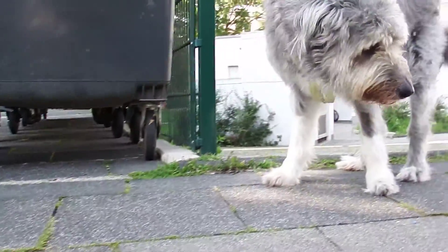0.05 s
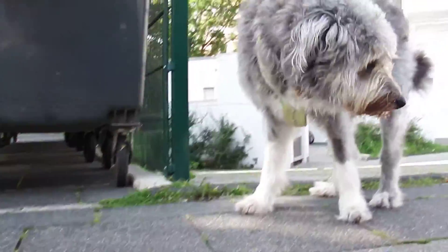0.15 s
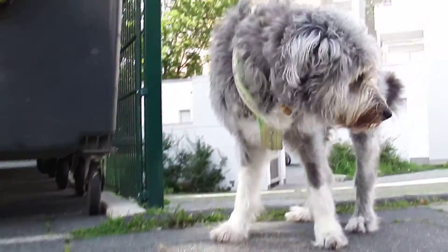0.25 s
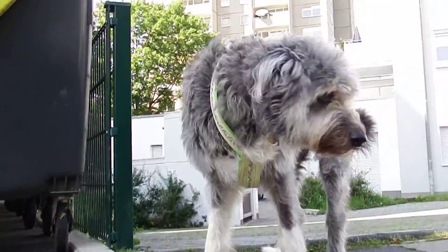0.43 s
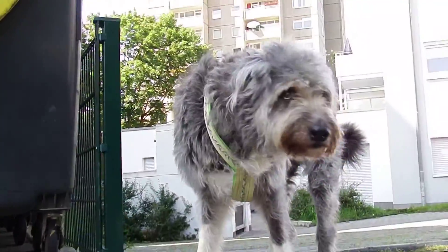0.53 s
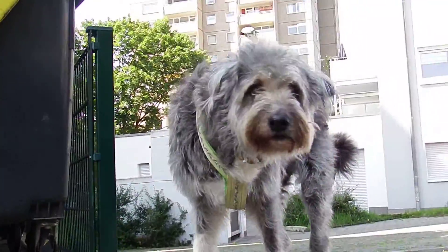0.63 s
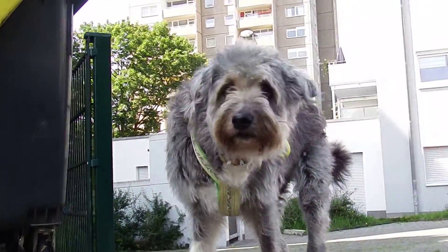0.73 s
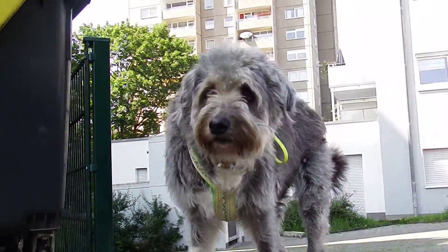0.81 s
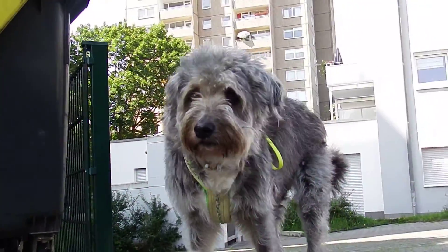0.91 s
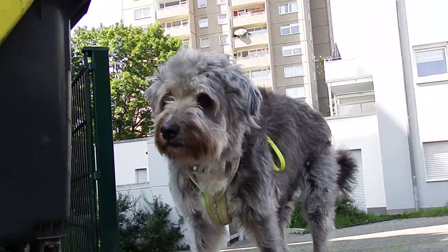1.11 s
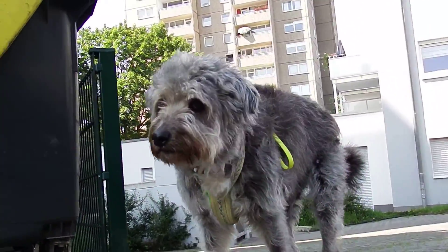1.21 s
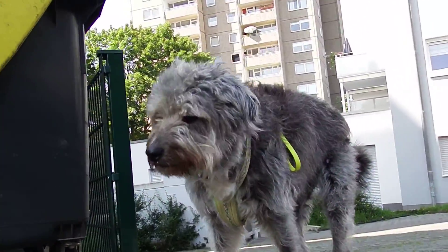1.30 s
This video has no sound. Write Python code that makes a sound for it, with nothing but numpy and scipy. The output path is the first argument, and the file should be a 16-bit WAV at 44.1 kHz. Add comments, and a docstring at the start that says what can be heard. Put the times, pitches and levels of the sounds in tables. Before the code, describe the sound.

A brief, hollow scrape of grit on paving stands out nearby, just after a few dull taps on the microphone. It ends with a crack, then soft shuffles and handling bumps sound against steady town noise in a yard.

```python
"""One short, gritty scuff on the pavement close by, which rings hollow and ends with a snap of grit.
Grinding grit is many tiny clicks mixed with hiss; bigger grains each give one sharp crack.
Three dull taps on a camera lead into the scuff, as the camera is lifted in front of a silent dog.
Later come a faint tap, soft shuffles and low bumps from the hand that holds it.
Behind it all is the steady wash of a yard between apartment blocks."""
import sys
import numpy as np
from scipy import signal
from scipy.fft import rfft, irfft
from scipy.io import wavfile
from scipy.ndimage import uniform_filter1d

SR = 44100
rng = np.random.default_rng(int(sys.argv[2]) if len(sys.argv) > 2 else 0)


def materialize(psi):
    """Save the field psi as 16-bit PCM at rate SR to the path in sys.argv[1].

    A 1-D psi becomes a single channel; in a 2-D psi each row is a channel.
    """
    bounded = np.clip(np.atleast_2d(psi).T, -1, 1)
    quanta = np.round(bounded * 32767).astype(np.int16)
    wavfile.write(sys.argv[1], SR, quanta)


N = 59535
TIME = np.arange(N) / SR

# How loud the scuff's bright rasp and dull body are: time_s, level_db
RASP_LEVEL = [(0.14, -55.5), (0.188, -44), (0.202, -36.5), (0.222, -40), (0.245, -38), (0.261, -32.5),
              (0.264, -25), (0.297, -24.5), (0.31, -24), (0.323, -22), (0.333, -27.5), (0.346, -49),
              (0.415, -49.5), (0.49, -71)]
BODY_LEVEL = [(0.185, -58), (0.204, -41), (0.252, -44), (0.273, -31), (0.31, -32), (0.322, -44.5),
              (0.35, -55)]
# Their tone colour, or how strong they are from low to high: frequency_hz, level_db
RASP_COLOUR = [(40, -75), (200, -62), (700, -17), (1300, -5), (1600, -12.5), (2700, 1), (3850, -0.5),
               (4200, -10.5), (4800, -10.5), (6100, -25), (8800, -27.5), (12500, -46), (15500, -58)]
BODY_COLOUR = [(60, -64), (190, -38), (440, 1.5), (620, -7), (1350, -1.5), (2000, -5), (5000, -48)]
# Thin ringing notes in the rasp: pitch_hz, width_hz, gain_db
RASP_RINGS = [(3320, 55, 0), (4440, 60, 3)]
# How alike the scuff is on the left and right: frequency_hz, likeness_0_to_1
SCUFF_LIKENESS = [(200, 0.79), (700, 0.99), (4000, 0.89), (8000, 0.11), (15000, 0.22)]


def scuff():
    """Grit grinds on the paving: a bright rasp with thin rings, over a dull body and a hollow ring."""
    rasp = level(RASP_LEVEL) * coloured(grit(), RASP_COLOUR, SCUFF_LIKENESS)
    rings = sum(amp(db) * signal.lfilter(*signal.iirpeak(hz, hz / width, SR), rasp)
                for hz, width, db in RASP_RINGS)
    body = level(BODY_LEVEL) * coloured(grit(), BODY_COLOUR, SCUFF_LIKENESS)
    return rasp + rings + body + hollow_ring()


def grit(clicks_per_s=3000, spread_db=2.5, click_share=0.45):
    """Tiny grains make clicks of uneven size, mixed with the smooth hiss of rubbing."""
    sizes = amp(spread_db * np.minimum(rng.exponential(1, N), 3))
    hits = rng.random(N) < clicks_per_s / SR
    clicks = unit(sizes * hits * rng.choice([-1, 1], (2, N)))
    return np.sqrt(click_share) * clicks + np.sqrt(1 - click_share) * hiss()


# The sliding hollow note inside the scuff: time_s, pitch_hz, level_db
HOLLOW_NOTE = [(0.13, 780, -78), (0.203, 920, -43), (0.228, 730, -43), (0.26, 740, -44),
               (0.281, 750, -27.5), (0.291, 685, -26), (0.301, 710, -36), (0.309, 730, -27),
               (0.32, 750, -36), (0.332, 760, -36), (0.346, 760, -85)]


def hollow_ring(width_hz=145, evenness=0.8):
    """Rubbing keeps one hollow note ringing while its pitch slides."""
    times, hz, db = np.transpose(HOLLOW_NOTE)
    pitch = np.interp(TIME, times, hz)
    ring = resonate(rng.standard_normal(N), pitch, width_hz)
    evened = ring / (abs(ring) + 1e-20) ** evenness  # partly flattens the random swings in loudness
    ring = resonate(evened, pitch, width_hz).real
    return amp(np.interp(TIME, times, db)) * unit(cut_lows(ring, hz.min() / 2))


# Bigger grains that snap, and in the last row a faint tick as the hand touches the camera: start_s, peak_db,
# treble_db_per_octave
SNAPS = [(0.2632, -17, -1), (0.2726, -12.5, -5), (0.2806, -14, -7), (0.2857, -15, -6), (0.2897, -15, -7),
         (0.3174, -3.5, 0), (0.3217, -15, -3), (0.3255, -13, -4), (0.3775, -36, 2), (0.4125, -36, 2),
         (1.0542, -31.5, -12)]
# The tone colour of a snap: frequency_hz, level_db
SNAP_COLOUR = [(50, -65), (300, -35), (1200, -15), (2300, 0), (3200, 0), (4200, -6), (6000, -23),
               (8200, -23), (11000, -37), (15500, -53), (20000, -75)]
# Echoes from nearby surfaces: delay_s, gain_db
SNAP_ECHOES = [(.001, -9), (.0043, -14)]


def snaps(treble_from_hz=4000):
    """Single grains give way, each with a sharp crack and two quick echoes; one late tick of the hand sounds
    the same way."""
    out = np.zeros((2, N))
    for start_s, peak_db, tilt_db in SNAPS:
        colour = [(hz, db + tilt_db * max(np.log2(hz / treble_from_hz), 0)) for hz, db in SNAP_COLOUR]
        crack = click(colour)
        for delay_s, echo_db in [(0, 0)] + SNAP_ECHOES:
            add(out, start_s + delay_s, amp(peak_db + echo_db) * crack)
    return out


# Taps on the camera: start_s, peak_db, thud_db, thud_left_minus_right_db
TAPS = [(0.0729, -25, -54, 2), (0.1104, -24, -40, 7), (0.1361, -25.5, -33, 17), (1.0545, -35.5, -57, -2)]
# The tone colour of a tap and of the thud under it: frequency_hz, level_db
TAP_COLOUR = [(80, -62), (250, -12.5), (500, 1.5), (850, -4), (1350, -2), (1900, -20), (3000, -17.5),
              (6000, -51)]
THUD_COLOUR = [(30, -43), (110, -8.5), (200, 1.5), (380, 4), (650, -12.5), (2000, -73)]


def taps(echo_s=0.00559, echo_db=-8.5):
    """Each tap on the camera makes a dull click, one quick echo and a low thud."""
    out = np.zeros((2, N))
    tap, thud = -click(TAP_COLOUR), -click(THUD_COLOUR)
    for start_s, peak_db, thud_db, pan_db in TAPS:
        add(out, start_s, amp(peak_db) * tap)
        add(out, start_s + echo_s, amp(peak_db + echo_db) * tap)
        add(out, start_s, amp(thud_db) * pan(pan_db) * thud)
    return out


# How loud the hand's rubbing is: time_s, level_db
RUB_LEVEL = [(0.04, -64), (0.15, -48), (0.22, -50.5), (0.27, -69), (0.54, -52), (0.6, -65.5), (1.17, -62),
             (1.26, -50), (1.295, -39), (1.35, -68)]
# The tone colour of the rubbing: frequency_hz, level_db
RUB_COLOUR = [(25, -37), (60, -35), (110, -6.5), (170, 2.5), (300, 0), (500, -10.5), (1200, -53)]


def hand_rub():
    """The hand rubs on the camera with a low rumble that comes and goes."""
    return level(RUB_LEVEL) * coloured(hiss(), RUB_COLOUR, likeness=[(100, 0.19)])


# Bumps of the hand on the camera: start_s, level_db, pitch_hz, left_minus_right_db
BUMPS = [(0.001, -32.5, 217, -7.5), (0.2049, -35, 270, -15.5), (1.242, -38, 249, -5.5),
         (1.279, -38, 238, -6), (1.289, -32.5, 356, 7), (1.301, -42, 226, 16)]


def bumps(rise_s=0.0017, decay_s=0.0036, roughness=0.19, right_phase_rad=1.08):
    """Each bump gives the camera body a low, rough shake that dies away quickly."""
    out = np.zeros((2, N))
    t = np.arange(3000) / SR
    fade = (1 - np.exp(-t / rise_s)) * np.exp(-t / decay_s)
    fade /= fade.max()
    for start_s, db, pitch_hz, pan_db in BUMPS:
        rub = coloured(hiss(), RUB_COLOUR, YARD_LIKENESS)[:, :len(t)]
        tone = np.sin(2 * np.pi * pitch_hz * t + np.array([[0], [right_phase_rad]]))
        shake = cut_lows(fade * (tone + roughness * rub), below_hz=136)
        add(out, start_s, amp(db) * pan(pan_db) * shake)
    return out


# Faint shuffles: start_s, length_s, level_db, rise_s
SHUFFLES = [(1.053, .036, -46.5, .002), (1.14, .11, -52.5, .06), (1.3, .06, -44.5, .02)]
# Their tone colour: frequency_hz, level_db
SHUFFLE_COLOUR = [(50, -46), (350, 1), (600, 7), (950, -4.5), (1400, 1), (2000, -3), (3350, -1), (3580, 8),
                  (3900, -3), (6500, -28), (15000, -59)]


def shuffles(fade_s=0.033):
    """Light rubs on the gritty paving swell, hold and fade."""
    gain = np.zeros(N)
    for start_s, length_s, db, rise_s in SHUFFLES:
        rise = np.clip((TIME - start_s) / rise_s, 0, 1)
        fade = np.exp(-np.maximum(TIME - start_s - length_s, 0) / fade_s)
        gain += amp(db) * rise * fade
    return gain * coloured(grit(), SHUFFLE_COLOUR, SCUFF_LIKENESS)


# The tone colour of the yard: frequency_hz, level_db
YARD_COLOUR = [(25, -41), (110, -10), (170, -7.5), (270, 2.5), (450, 1.5), (800, -0.5), (1800, -2),
               (3350, 0), (3620, 3), (3900, -1.5), (4400, -4), (5200, -13.5), (6200, -21.5), (9000, -24),
               (15500, -33)]
# How alike left and right are in the yard (and the bumps' rubbing): frequency_hz, likeness_0_to_1
YARD_LIKENESS = [(60, 0), (180, 1), (1000, 0.81), (5000, 0.85), (7000, 0.01), (15000, 0.35)]


def yard(level_db=-48.5, patch_db=1.5):
    """The distant town and leaves blend into a steady wash with slightly louder and softer patches."""
    spectrum = signal.stft(hiss(), nperseg=512)[2]
    patches = rng.standard_normal(spectrum.shape[1:])
    patches = uniform_filter1d(patches, size=8, axis=0)  # smooth from low to high
    patches = unit(uniform_filter1d(patches, size=12, axis=1))  # smooth over time
    air = signal.istft(spectrum * amp(patch_db * patches))[1][:, :N]
    return amp(level_db) * coloured(air, YARD_COLOUR, YARD_LIKENESS)


def amp(db):
    """Turns decibels into a number to multiply by."""
    return 10 ** (np.asarray(db) / 20)


def unit(x):
    """Scales a sound to an average strength (rms) of 1."""
    return x / np.sqrt(np.mean(x ** 2) + 1e-20)


def read(points, hz):
    """Reads between a table's rows, giving each octave equal room."""
    row_hz, value = np.transpose(points)
    return np.interp(np.log(hz + 1), np.log(row_hz + 1), value)


def level(points):
    """Joins a table's levels into a volume curve over time."""
    return amp(np.interp(TIME, *np.transpose(points)))


def add(mix, start_s, sound):
    """Mixes a sound in at a given time."""
    part = mix[..., max(round(start_s * SR), 0):][..., :sound.shape[-1]]
    part += sound[..., :part.shape[-1]]


def pan(db):
    """Left and right volumes, db decibels apart."""
    return amp(np.array([[db], [-db]]) / 2)


def hiss():
    """Two unrelated white noises."""
    return rng.standard_normal((2, N))


def click(colour, size=2048):
    """A click of a given tone colour that starts sharply and peaks at 1."""
    log_gain = np.log(amp(read(colour, abs(np.fft.fftfreq(size, 1 / SR)))))
    spectrum = np.exp(np.conj(signal.hilbert(log_gain)))  # packs the energy at the start
    pulse = np.fft.ifft(spectrum).real[:size // 2]
    return pulse / abs(pulse).max()


def coloured(pair, colour, likeness):
    """Gives two unrelated noises a tone colour and blends them into left and right."""
    hz = np.fft.rfftfreq(N, 1 / SR)
    alike = np.clip(read(likeness, hz), -1, 1)
    mid, side = rfft(pair) * np.sqrt([1 + alike, 1 - alike]) * amp(read(colour, hz))
    return unit(irfft(np.array([mid + side, mid - side]), N))


def resonate(x, hz, width_hz):
    """Makes a sound ring along a pitch curve; abs() of the result is its strength."""
    turn = np.exp(2j * np.pi * np.cumsum(hz) / SR)
    decay = np.exp(-np.pi * width_hz / SR)
    return turn * signal.lfilter([1 - decay], [1, -decay], x / turn)


def cut_lows(x, below_hz):
    """Turns down the deepest part of a sound."""
    return signal.sosfilt(signal.butter(2, below_hz, "highpass", fs=SR, output="sos"), x)


def scene():
    """All the sounds meet at the camera."""
    return yard() + scuff() + snaps() + taps() + hand_rub() + bumps() + shuffles()


# How the microphone's two openings lean left or right: frequency_hz, left_minus_right_db
MIC_BALANCE = [(150, -2.5), (500, 1), (2800, 1.4), (4500, -1.5), (9000, 0.3)]
# Narrow dips in what the microphone picks up: frequency_hz, width_hz
MIC_DIPS = [(1092, 123), (214.4, 29.5)]


def record(dry, top_hz=15750):
    """The microphone colours each side, dips two narrow bands and loses the highest treble."""
    balance_db = read(MIC_BALANCE, np.fft.rfftfreq(2 * N, 1 / SR))
    side_gains = amp(np.array([balance_db, -balance_db]) / 2)
    sound = irfft(rfft(dry, 2 * N) * side_gains)[:, :N]
    for hz, width in MIC_DIPS:
        sound = signal.lfilter(*signal.iirnotch(hz, hz / width, SR), sound)
    treble_cut = signal.firwin(511, top_hz, window=("kaiser", 9), fs=SR)
    return signal.oaconvolve(sound, treble_cut[None], "same")


dry = scene()
out = record(dry)
materialize(out)
```